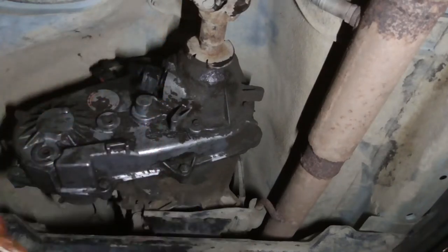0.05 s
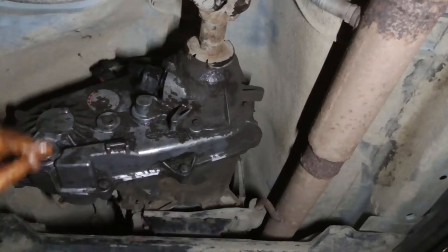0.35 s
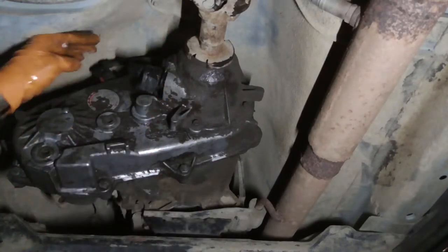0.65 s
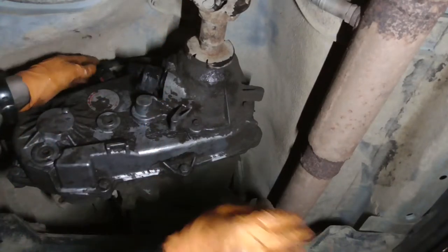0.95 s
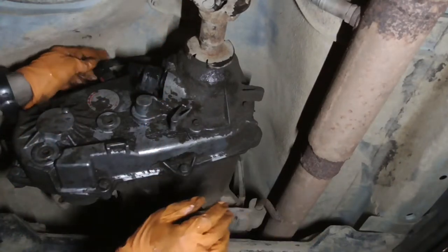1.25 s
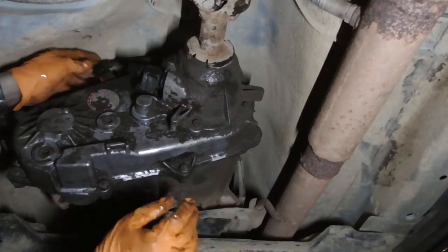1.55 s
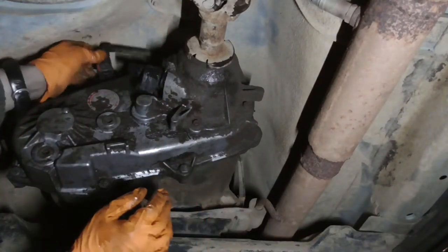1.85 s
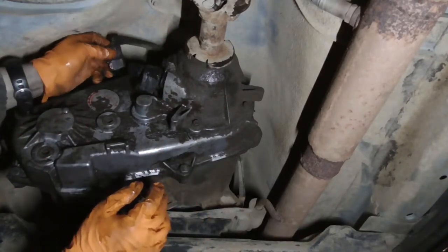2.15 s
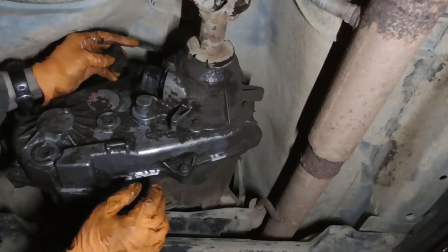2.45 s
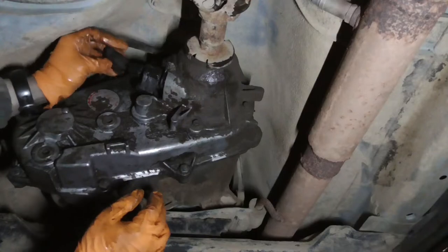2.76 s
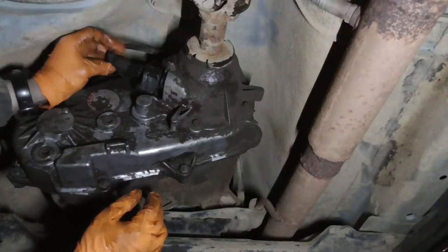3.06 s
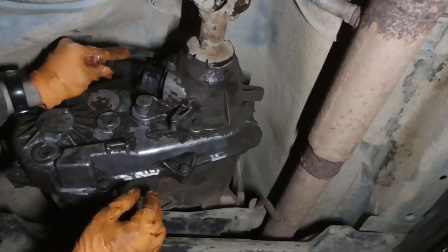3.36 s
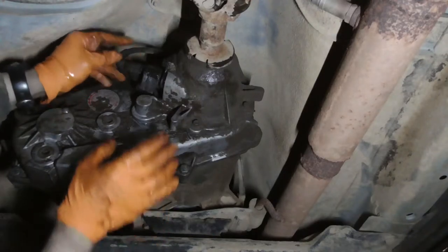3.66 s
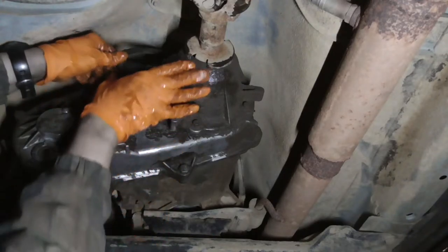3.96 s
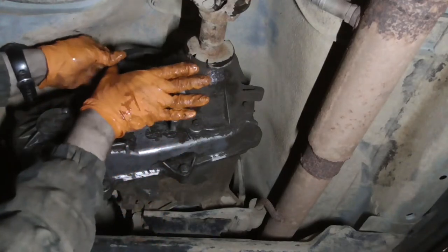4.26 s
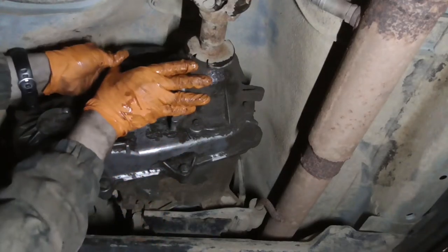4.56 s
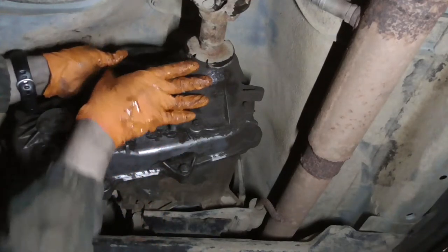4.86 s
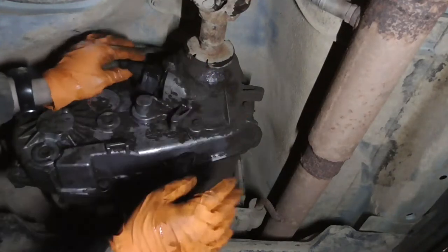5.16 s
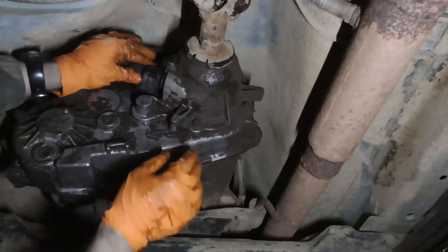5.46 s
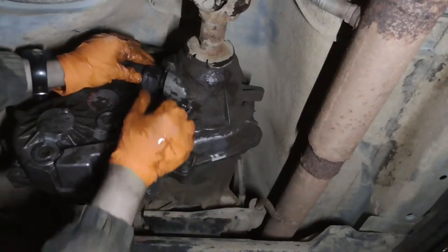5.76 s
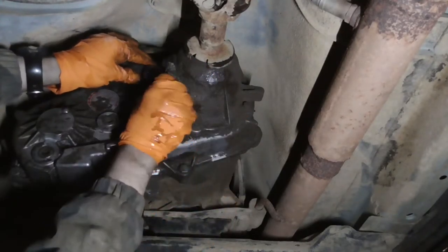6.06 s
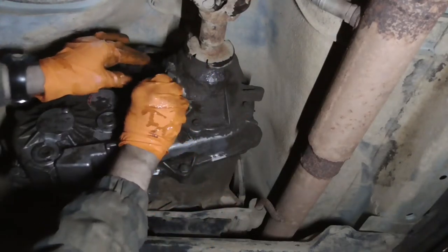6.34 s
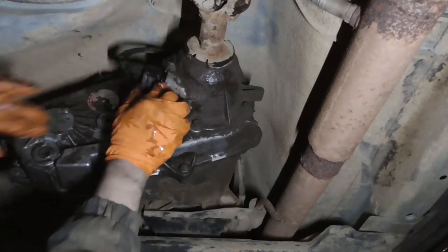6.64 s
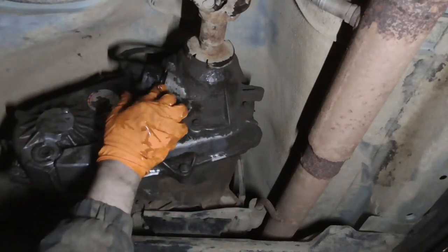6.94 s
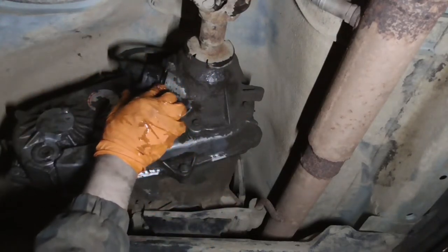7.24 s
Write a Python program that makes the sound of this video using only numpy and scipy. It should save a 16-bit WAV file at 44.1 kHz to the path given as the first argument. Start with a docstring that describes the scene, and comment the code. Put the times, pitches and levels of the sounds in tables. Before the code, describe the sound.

Rubber gloves and sleeves rub over a metal gearbox housing throughout, a fine hiss and dull rasp that swell in irregular swipes. The sound is close, with short reflections from the car's underbody and a quiet, low garage rumble behind. A loose bracket gives a small clank at 0.1 seconds. Between 0.5 and 0.9 seconds a small steel part clicks sharply several times with a thin, high ring. A short scrape follows at 1 second, a soft knock at 1.6 and a stronger, hollow knock at 1.9. A swipe with a faint squeak comes at 2.4 seconds, and a louder, high rubber squeak at 3.5. At 4 seconds a knock and scrape set the housing ringing briefly. Lighter scrapes and swipes continue, with a few clearer strokes around 6.2 seconds, and soft rubbing lasts until about 7.5 seconds.

```python
"""Gloved hands rub and swipe over a gearbox housing under a car, fitting a small steel part up close.
Dense micro-slips of gloves and sleeves make a hiss and a dull rasp; the rubber catches and squeaks.
The part clicks and rings, knocks and scrapes set the casting ringing, and a loose bracket clanks.
The underbody throws short reflections back from the hits; the garage rumbles quietly behind."""
import sys
import numpy as np
from scipy import signal
from scipy.fft import rfft, irfft, next_fast_len
from scipy.io import wavfile
from scipy.ndimage import uniform_filter1d

SR = 44100
rng = np.random.default_rng(int(sys.argv[2]) if len(sys.argv) > 2 else 0)


def to_wav(sig):
    """Store sig (one row per channel, or 1-D mono) as 16-bit WAV at the path in sys.argv[1].

    Samples outside -1..1 are clipped; the rate is SR.
    """
    pcm = np.clip(np.atleast_2d(sig), -1, 1) * 32767
    pcm = np.round(pcm).astype(np.int16)
    wavfile.write(sys.argv[1], SR, pcm.T)  # frames by channels


N = 330749
T = np.arange(N) / SR
HIT_T = T[:SR // 3]  # time axis of one hit and its tail
TOP_HZ = 15700

# EQ of the side channel against the mid, for diffuse sound: freq_hz, gain_db
SIDE_EQ = [(60, -20), (200, -11.5), (400, -9.5), (700, -4.5), (2400, -6), (4400, -5), (8000, -2),
           (15000, -4)]
# room tone of the garage: freq_hz, gain_db
GARAGE_EQ = [(25, -29.5), (40, -17), (56, -0.5), (78, 0.5), (100, -1), (145, 0.5), (190, -3.5), (300, -5),
             (370, -8.5), (750, -12.5), (1400, -23.5), (2500, -35), (9000, -35.5), (16000, -38)]
# ring of the loose bracket: pitch_hz, level_db, t60_s
BRACKET_MODES = [(857, -4, 0.11), (899, 7.5, 0.083), (1283, -2, 0.055), (1307, 3, 0.062), (1654, -4, 0.067),
                 (2050, -6, .07), (2910, -5, .05)]
# the bracket chatters under a passing hand: start_s, level_db
BRACKET_TAPS = [(0.1208, -40), (0.1253, -30.5), (0.1324, -35.5), (.135, -36.5)]
# ring of the gearbox housing: pitch_hz, level_db, t60_s
HOUSING_MODES = [(152, -0.5, 0.16), (302, 9, 0.11), (431, -2, 0.25), (767.5, -6, 0.51), (1218, 10, 0.049),
                 (1418, 14.5, 0.033), (1450, -15, 0.086), (1800, -19, 0.095), (2010, -10, 0.11)]
# soft knocks on the housing: start_s, level_db, pitch_hz, width_hz
SOFT_KNOCKS = [(0.699, -30.5, 254, 130), (1.4657, -48.5, 993, 1100), (1.6113, -31.5, 520, 620),
               (1.6205, -40.5, 367, 350), (1.9214, -22, 277.6, 33.2), (1.922, -31, 155, 24.9),
               (2.134, -47, 600, 700), (2.519, -46, 690, 600), (3.254, -45, 650, 500),
               (3.456, -44.5, 590, 400), (3.992, -46.5, 1500, 1500), (4.0398, -26.5, 783, 26.6),
               (4.041, -33.5, 1390, 150), (4.0476, -31, 600, 700), (4.415, -35, 280, 50),
               (4.459, -46.5, 1270, 900), (4.577, -58, 1700, 2000), (4.625, -53, 1700, 2000),
               (4.7463, -53.5, 1300, 2000), (6.388, -54, 1600, 500)]
# short juddering scrapes on the housing: peak_s, level_db, rise_s, fall_s, pitch_hz, width_hz
HOUSING_SCRAPES = [(0.131, -35.5, 0.0056, 0.0051, 1300, 1506), (0.566, -41, 0.0035, 0.012, 1200, 1990),
                   (1.047, -30.5, 0.0068, 0.012, 1180, 1210), (1.225, -43, 0.0056, 0.007, 990, 494),
                   (2.39, -53, 0.036, 0.014, 1290, 2500), (3.503, -44, 0.026, 0.023, 790, 880),
                   (4.045, -36.5, 0.0051, 0.0064, 1250, 350), (4.048, -30.5, 0.0034, 0.018, 436, 400),
                   (4.4, -46.5, 0.055, .035, 690, 890), (4.931, -42.5, 0.003, 0.0071, 2100, 1900),
                   (5.089, -47.5, 0.0055, 0.01, 2430, 2470), (6.13, -56, 0.046, 0.033, 1454, 90)]
# rubber squeaks: peak_s, level_db, half_length_s, pitch_hz, width_hz
RUBBER_SQUEAKS = [(2.44, -48.5, 0.02, 4300, 230), (2.442, -50.5, 0.011, 10080, 300),
                  (2.987, -56.5, 0.0083, 4210, 300), (3.502, -37, .022, 6750, 1400),
                  (3.504, -28.5, .008, 8000, 1000)]
# ring of the steel part: pitch_hz, level_db, t60_s
PART_MODES = [(7260, -20, 0.066), (7370, -4.5, 0.08), (7400, -1, 0.095), (7590, -10, 0.065),
              (7900, -11.5, 0.12), (8600, -14.5, 0.1), (8500, -22, .11), (8900, -15.5, .11),
              (12200, -29, .08)]
# steel meets steel, ring and clack set against the crack: start_s, level_db, ring_db, clack_db
STEEL_CLICKS = [(0.5016, -32, -25, -4.5), (0.5032, -22.5, -26, -35), (0.5076, -30, -22, -12.5),
                (0.521, -24, -21, -3), (0.522, -28.5, -19, -22), (0.5619, -44.5, -9, 6),
                (0.7831, -24, 2, -7), (0.839, -32.5, 6, -10), (0.866, -48, -9, -12.5)]
# bright crack of a click: freq_hz, gain_db
CRACK_EQ = [(1500, -20), (2300, -5), (2900, -9.5), (4200, -2), (6300, -1.5), (7700, 3), (9500, 6),
            (12000, 2), (14000, -10), (16000, -5)]
# hollow clack of the housing under a click: freq_hz, gain_db
CLACK_EQ = [(40, -32.5), (110, -17), (280, 4), (520, 8.5), (800, 1.5), (1300, 4), (1800, -2.5),
            (2300, -0.5), (3000, -14), (6000, -43)]
# light, lasting contact of gloves and sleeves between strokes: time_s, hiss_db, rasp_db
RUB_LEVELS = [(0, -54, -48), (.47, -57, -50), (.65, -53.5, -53.5), (1.15, -55.5, -49), (1.5, -61.5, -55),
              (1.85, -56.5, -54), (2.2, -60, -55.5), (2.75, -62, -54), (3.36, -67.5, -62),
              (3.62, -66, -59.5), (3.85, -55.5, -54.5), (4.62, -60.5, -55), (4.78, -77, -69),
              (4.88, -61, -59), (5.17, -60.5, -53.5), (5.45, -65.5, -66.5), (5.88, -61, -53.5),
              (6.2, -60, -67.5), (7.0, -63, -57), (7.5, -65.5, -60)]
# bright side of the rubbing: freq_hz, gain_db
HISS_EQ = [(1200, -31.5), (2000, -2.5), (2600, -6.5), (3500, -2), (4500, -2.5), (5700, -7), (8000, -3),
           (11000, -1.5), (13100, -7), (15100, -15), (16000, -29)]
# dull side of the rubbing: freq_hz, gain_db
RASP_EQ = [(100, -13.5), (280, 5.5), (520, 8), (780, 3.5), (1050, 0.5), (1430, -3), (1750, -8), (2200, -10),
           (3000, -13), (6000, -39)]
# strokes of a glove over the casting: peak_s, level_db, rise_s, fall_s, brightest_hz
GLOVE_STROKES = [(.125, -46, 0.056, 0.11, 8400), (.43, -54, 0.046, 0.032, 7500),
                 (0.716, -34, 0.015, 0.049, 8000), (.88, -44, .016, 0.038, 7300),
                 (.93, -45, 0.022, 0.012, 7000), (1.05, -47, .028, 0.091, 9500),
                 (1.306, -41, 0.0096, 0.01, 11500), (1.35, -52.5, 0.012, 0.019, 5080),
                 (1.52, -53, 0.011, 0.012, 9000), (1.73, -49, 0.07, 0.074, 8500),
                 (1.88, -51.5, .03, .01, 9500), (1.928, -43.5, .005, 0.024, 8800),
                 (2.06, -49.5, 0.034, 0.013, 6000), (2.14, -47.5, 0.019, 0.012, 9300),
                 (2.26, -51.5, .012, 0.02, 8430), (2.394, -39.5, .05, .018, 7700),
                 (2.528, -48, 0.0033, .008, 5200), (2.67, -53, 0.029, 0.036, 4720),
                 (2.89, -50.5, 0.02, 0.024, 8500), (3, -52.5, 0.01, 0.022, 7000),
                 (3.07, -55.5, .015, .055, 7500), (3.175, -43, 0.013, 0.014, 7260),
                 (3.23, -55.5, 0.014, 0.02, 8000), (3.33, -59, 0.027, .06, 11000),
                 (3.5, -37.5, 0.024, 0.031, 9000), (3.505, -32, 0.0042, 0.0046, 9500),
                 (3.68, -51, 0.014, 0.032, 10000), (3.77, -51, 0.022, 0.027, 7000),
                 (3.99, -42.5, 0.062, 0.043, 9000), (4.05, -43.5, 0.019, 0.018, 8700),
                 (4.29, -48, .035, 0.083, 9400), (4.4, -45, 0.018, 0.052, 9300),
                 (4.53, -56.5, .012, 0.013, 8500), (4.82, -61, .006, 0.017, 8500),
                 (4.899, -45, 0.04, 0.036, 7750), (5.02, -49, 0.032, 0.04, 9500),
                 (5.095, -49.5, .0073, .011, 9000), (5.128, -46, .0094, .008, 9500),
                 (5.3, -57, 0.11, 0.048, 4460), (5.755, -48.5, 0.015, 0.024, 7000),
                 (5.86, -54, 0.064, 0.035, 9500), (6, -55, 0.01, .025, 8500),
                 (6.13, -44.5, 0.023, 0.024, 6640), (6.207, -39.5, .012, 0.014, 6200),
                 (6.336, -46.5, .015, .013, 7300), (6.46, -52, 0.04, 0.04, 9500),
                 (6.57, -49.5, 0.021, 0.029, 7500), (6.67, -58.5, 0.064, 0.077, 9500),
                 (6.774, -48, .002, 0.008, 11500), (7.075, -57.5, .04, 0.046, 4800),
                 (7.21, -59, .014, 0.011, 8500)]


def undb(db):
    """Decibels to gain."""
    return 10 ** (np.asarray(db) / 20)


def unit(x):
    """Scale to rms 1."""
    return x / np.sqrt(np.mean(x ** 2))


def burst(x):
    """Scale a hit to the energy of 10 ms at rms 1."""
    return x * np.sqrt(.01 * SR / np.mean(np.sum(x ** 2, axis=-1)))


def add(out, start_s, x):
    """Drop a sound into the mix at its start time."""
    i = int(start_s * SR)
    out[:, i:i + x.shape[-1]] += x[..., :N - i]


def eq(x, points):
    """Minimum-phase EQ through (freq_hz, gain_db) points: no pre-ring ahead of a hit."""
    size = next_fast_len(x.shape[-1] + 4096, True) // 2 * 2
    hz, db = np.transpose(points)
    bin_hz = np.arange(size // 2 + 1) * SR / size
    log_gain = np.log(undb(np.interp(np.log(bin_hz + 1), np.log(hz), db)))
    cepstrum = irfft(log_gain)[:size // 2]
    cepstrum[1:] *= 2
    return irfft(rfft(x, size) * np.exp(rfft(cepstrum, size)))[..., :x.shape[-1]]


def resonate(x, hz, width_hz):
    """One resonance, gain 1 at its centre."""
    q = hz / min(width_hz, SR / 3)
    return signal.lfilter(*signal.iirpeak(min(hz, SR / 3), q, fs=SR), x)


def delay(x, lag_s):
    """Delay that can be finer than one sample."""
    size = next_fast_len(N, True)
    bin_hz = np.arange(size // 2 + 1) * SR / size
    return irfft(rfft(x, size) * np.exp(-2j * np.pi * bin_hz * lag_s), size)[:N]


def ring(modes):
    """One blow sets off a set of decaying modes."""
    return sum(undb(db - 60 * HIT_T / t60) * np.cos(2 * np.pi * hz * HIT_T) for hz, db, t60 in modes)


def wander(rate_hz):
    """Smooth random modulation with a spread near 1."""
    hold = int(SR / rate_hz)
    steps = np.repeat(rng.standard_normal(N // hold + 1), hold)
    return 1.2 * uniform_filter1d(steps, hold)[:N]


def swell(peak_s, rise_s, fall_s):
    """Speed of one stroke: it builds exponentially to its peak and dies away."""
    distance = np.where(T < peak_s, (peak_s - T) / rise_s, (T - peak_s) / fall_s)
    return np.exp(-np.minimum(distance, 20))


def slips(spread_db):
    """Friction grain: two streams of dense micro-slips of uneven size."""
    size = np.repeat(rng.standard_normal((2, N // 16 + 1)), 16, axis=1)[:, :N]
    return unit(rng.standard_normal((2, N)) * undb(spread_db * size))


def widen(pair):
    """Two unrelated streams become left and right, nearly mono in the bass."""
    side = eq(pair[1], SIDE_EQ)
    return np.array([pair[0] + side, pair[0] - side])


def reflect(x, wet_db, t60_s, tail_db, tail_t60_s):
    """Direct sound, dense reflections from the underbody, and a faint garage tail."""
    decay = undb(-60 * HIT_T / t60_s) + undb(tail_db - 60 * HIT_T / tail_t60_s)
    echoes = widen(rng.standard_normal((2, len(HIT_T)))) * decay * (HIT_T > .0012)  # 1.2 ms pre-delay
    response = undb(wet_db) * echoes / np.sqrt(np.sum(echoes ** 2) / 2)
    response[:, 0] = 1  # direct sound
    return signal.fftconvolve(x, response, axes=1)[:, :N] / np.sqrt(1 + undb(2 * wet_db))


def garage(level_db=-52.5):
    """Room tone: the low, slightly restless rumble of the workshop."""
    rumble = unit(widen(eq(rng.standard_normal((2, N)), GARAGE_EQ)))
    return undb(level_db + 0.21 * wander(rate_hz=4)) * rumble


def bracket():
    """Quick taps of the loose bracket run together into one small clank."""
    taps = np.zeros((1, N))
    tap = burst(resonate(ring(BRACKET_MODES), hz=1070, width_hz=1900))
    for start_s, db in BRACKET_TAPS:
        add(taps, start_s, undb(db) * tap)
    return reflect(taps, wet_db=-0.5, t60_s=0.045, tail_db=-7, tail_t60_s=0.48)


def housing(push, ring_db):
    """The casting rings when pushed; ring_db sets the ring against the push."""
    rung = signal.fftconvolve(push, np.atleast_2d(ring(HOUSING_MODES)), axes=1)[:, :push.shape[1]]
    return undb(ring_db) * rung * push.std() / rung.std()


def knocks():
    """Padded blows: a damped swing of the spot that is hit, with little treble and no deep bass."""
    blows = np.zeros((1, N))
    for start_s, db, hz, width_hz in SOFT_KNOCKS:
        swing = np.exp(-np.pi * width_hz * HIT_T) * np.sin(2 * np.pi * hz * HIT_T)
        add(blows, start_s, undb(db) * burst(resonate(swing, hz, width_hz=2.2 * hz)))
    padded = eq(blows, [(60, -15), (150, -2), (1500, -2.0), (2200, -10.5)])
    near = reflect(padded, wet_db=-7, t60_s=.055, tail_db=-10, tail_t60_s=.35)
    return near + housing(padded, ring_db=-14)


def scrapes():
    """Coarse stick-slip shakes the housing for a moment."""
    grain = eq(slips(spread_db=3)[:1], [(120, -12), (250, 0), (1600, 0), (2600, -10), (7000, -20)])
    judder = sum(unit(resonate(grain, hz, width_hz)) * undb(db) * swell(peak_s, rise_s, fall_s)
                 for peak_s, db, rise_s, fall_s, hz, width_hz in HOUSING_SCRAPES)
    near = reflect(judder, wet_db=-2.5, t60_s=0.072, tail_db=-26, tail_t60_s=0.3)
    return near + housing(judder, ring_db=-18)


def squeaks():
    """Rubber catches on the metal: its slips bunch into a brief, hoarse pitch."""
    grain = widen(slips(spread_db=0.5))
    out = np.zeros((2, N))
    for peak_s, db, half_length_s, hz, width_hz in RUBBER_SQUEAKS:
        tone = unit(resonate(resonate(grain, hz, width_hz), hz, width_hz))
        envelope = np.exp(-((T - peak_s) / half_length_s) ** 2)
        out += undb(db) * envelope * tone
    return out


def clicks():
    """Steel on steel in three layers: a millisecond of crack, the housing's clack, the part's ring."""
    cracks, clacks, rings = np.zeros((3, 1, N))
    part_ring = burst(ring(PART_MODES))
    # a contact stiffens as it closes, sweeping up through all pitches in about a millisecond
    sweep = np.sin(np.pi * TOP_HZ * HIT_T ** 2 / .0012) * (HIT_T < .0013)
    crack = burst(eq(sweep, CRACK_EQ))
    clack = burst(eq(signal.unit_impulse(len(HIT_T)), CLACK_EQ))
    for start_s, db, ring_db, clack_db in STEEL_CLICKS:
        add(cracks, start_s, undb(db) * crack)
        add(clacks, start_s, undb(db + clack_db) * clack)
        add(rings, start_s, undb(db + ring_db) * part_ring)
    cracks = reflect(cracks, wet_db=-4, t60_s=.06, tail_db=-22, tail_t60_s=.3)
    clacks = reflect(clacks, wet_db=-3.5, t60_s=0.052, tail_db=-12, tail_t60_s=0.38)
    rings = reflect(rings, wet_db=-9, t60_s=.015, tail_db=-24, tail_t60_s=.3)
    left, right = cracks + clacks + rings
    return np.array([delay(left, lag_s=.00001), right])  # the click reaches the right slightly sooner


def flicker(pair, patchy_db):
    """Narrow bands of the hiss flare and fade at random, giving it an uneven, shimmering texture."""
    _, _, frames = signal.stft(pair, nperseg=256, noverlap=192)
    patches = uniform_filter1d(rng.standard_normal(frames.shape[1:]), size=2, axis=0)
    patches = uniform_filter1d(patches, size=36, axis=1)  # a flare lasts about 50 ms
    _, shimmer = signal.istft(frames * undb(patchy_db * unit(patches)), nperseg=256, noverlap=192)
    return shimmer[:, :N]


def rubbing():
    """Gloves and sleeves slide: a fine surface hiss, and a dull casting rasp that grows with strokes."""
    time_s, hiss_db, rasp_db = np.transpose(RUB_LEVELS)
    hiss = flicker(widen(eq(slips(spread_db=1.5), HISS_EQ)), patchy_db=2.5)
    rasp = widen(eq(slips(spread_db=4), RASP_EQ))
    contact = undb(np.interp(T, time_s, hiss_db))
    strokes = sum(undb(db) * swell(peak_s, rise_s, fall_s)
                  for peak_s, db, rise_s, fall_s, _ in GLOVE_STROKES)
    # the rasp gains about 0.32 dB for each dB that a stroke stands above the light contact
    stroke_lift = np.hypot(1, strokes / contact) ** 0.32
    hiss_gain = contact * undb(1.06 * wander(rate_hz=50))
    rasp_gain = undb(np.interp(T, time_s, rasp_db) + 0.95 * wander(rate_hz=35)) * stroke_lift
    return hiss_gain * unit(hiss) + rasp_gain * unit(rasp + housing(rasp, ring_db=-7))


def swipes():
    """Strokes of rubber over the casting swell and fade, each brightest in its own broad band."""
    grain = flicker(widen(eq(slips(spread_db=2), HISS_EQ)), patchy_db=3)
    return sum(unit(resonate(grain, hz, width_hz=1.16 * hz)) * undb(db) * swell(peak_s, rise_s, fall_s)
               for peak_s, db, rise_s, fall_s, hz in GLOVE_STROKES)


def scene():
    """All the handwork over the garage room tone."""
    return rubbing() + swipes() + scrapes() + squeaks() + knocks() + bracket() + clicks() + garage()


def record(dry):
    """Each microphone port colours the treble its own way; a steep low-pass cuts the top."""
    left = eq(dry[0], [(300, 0.8), (1300, 0.27), (7000, 2.5), (10000, 1.05), (13500, -1.5)])
    right = eq(dry[1], [(300, 0.74), (1300, -1.23), (7000, 1.2), (10000, -1.0), (13500, 2.8)])
    top_cut = signal.ellip(8, .2, 70, TOP_HZ, fs=SR, output="sos")
    return signal.sosfilt(top_cut, np.array([left, right]))


dry = scene()
out = record(dry)
to_wav(out)
```